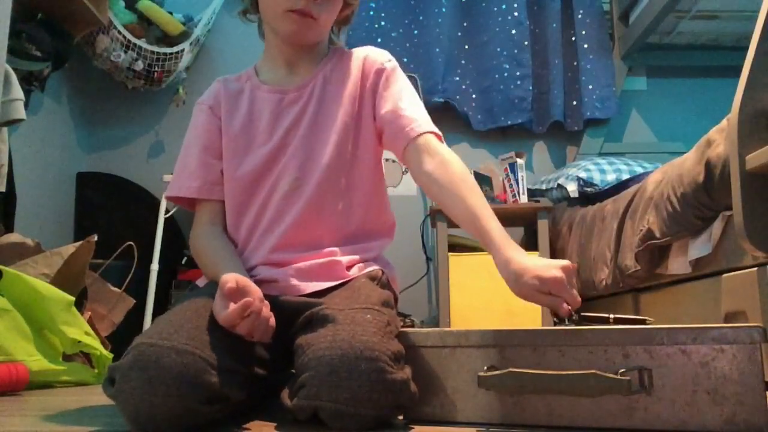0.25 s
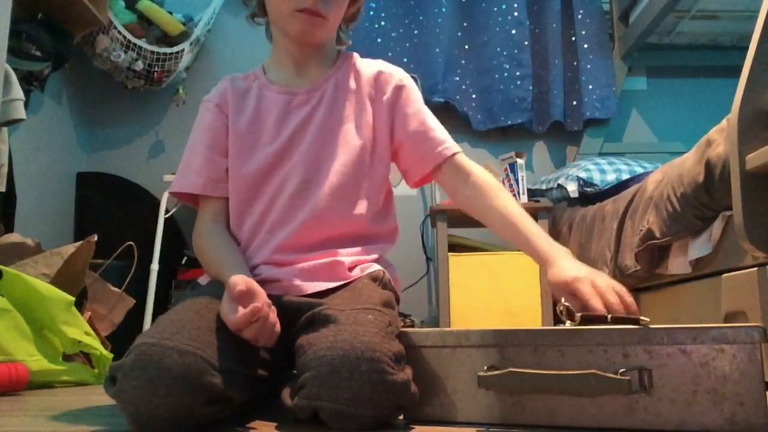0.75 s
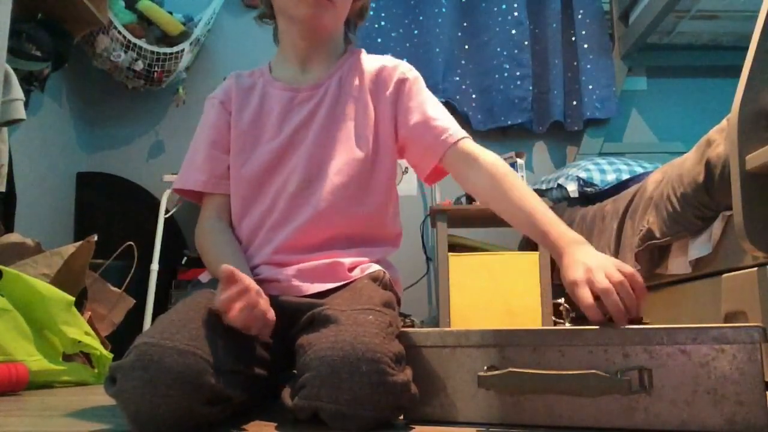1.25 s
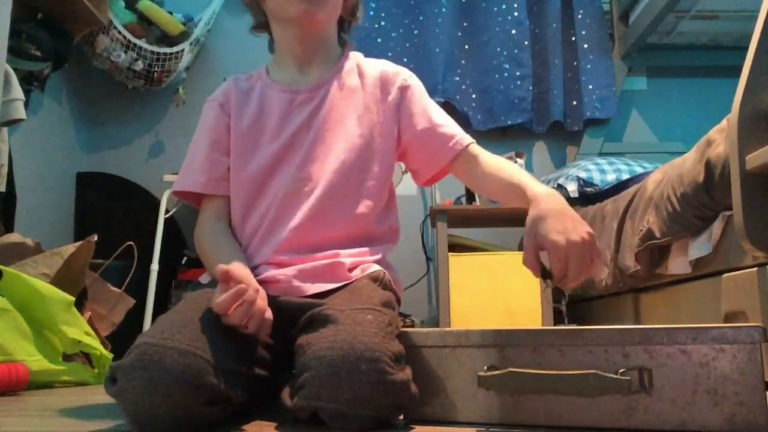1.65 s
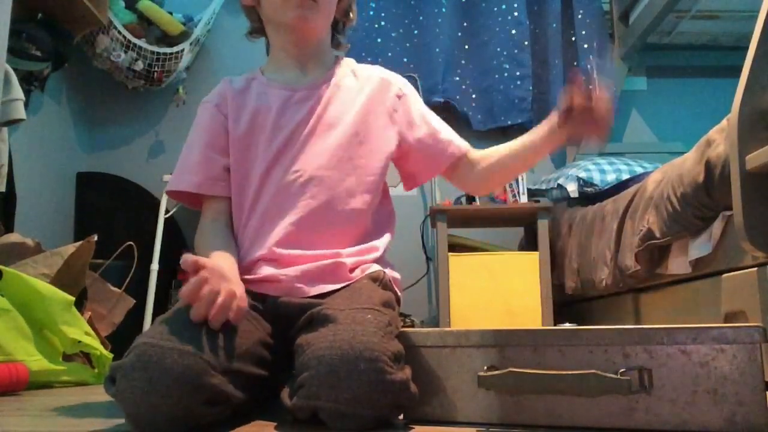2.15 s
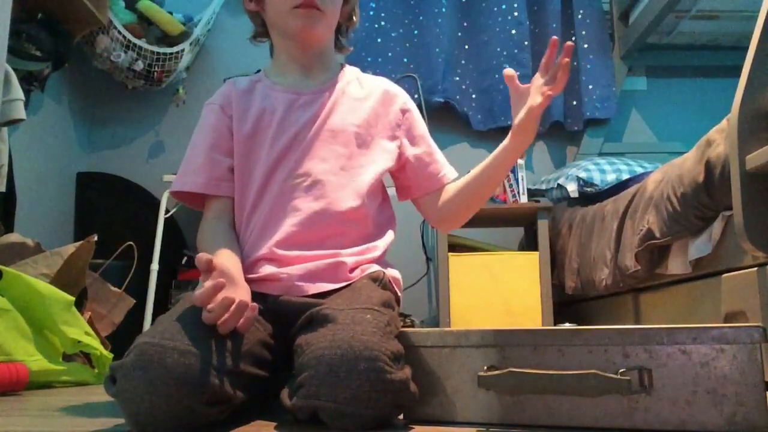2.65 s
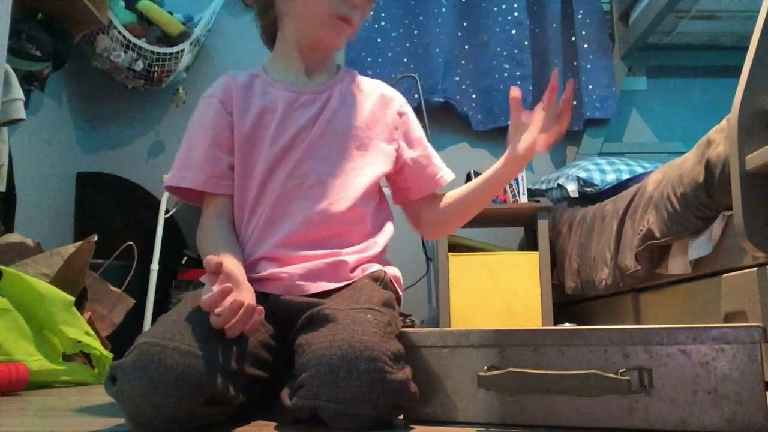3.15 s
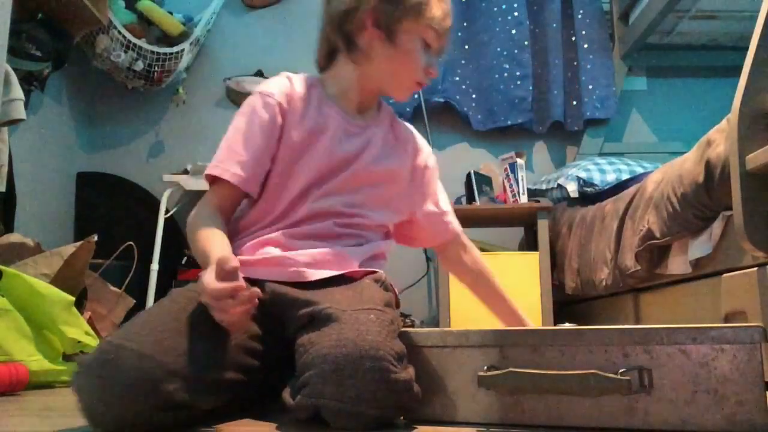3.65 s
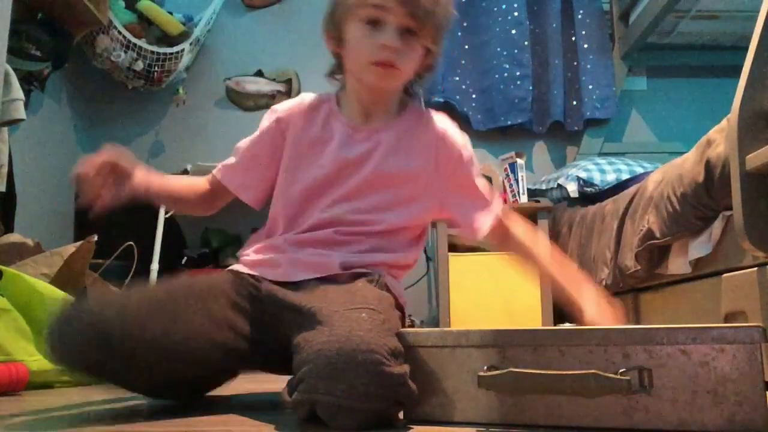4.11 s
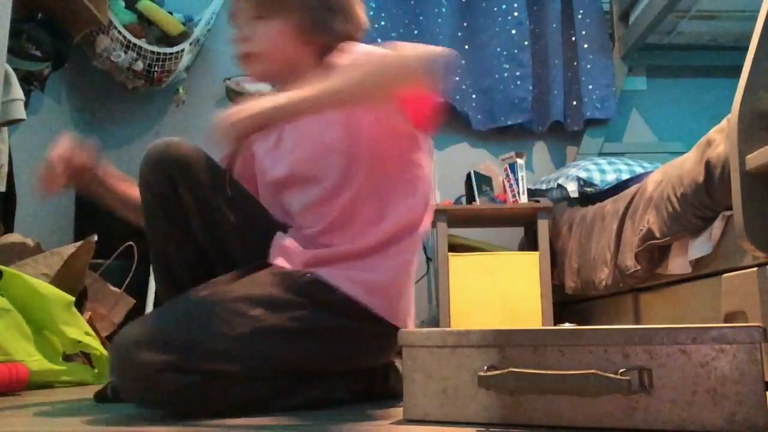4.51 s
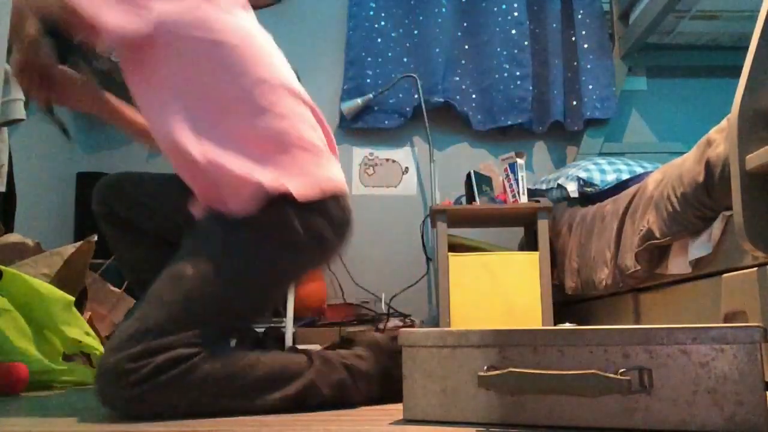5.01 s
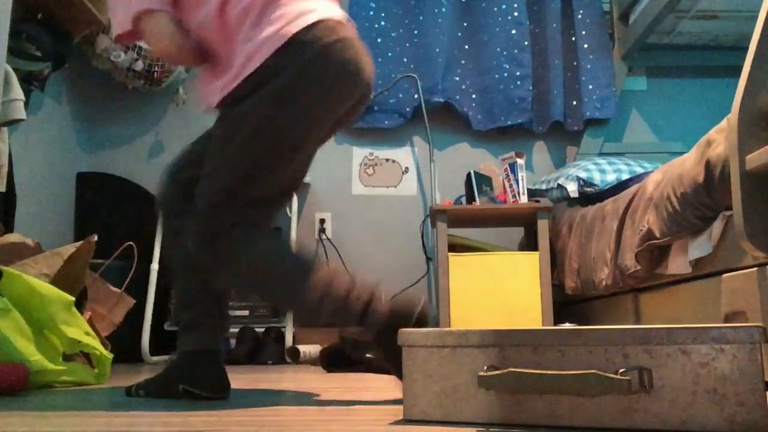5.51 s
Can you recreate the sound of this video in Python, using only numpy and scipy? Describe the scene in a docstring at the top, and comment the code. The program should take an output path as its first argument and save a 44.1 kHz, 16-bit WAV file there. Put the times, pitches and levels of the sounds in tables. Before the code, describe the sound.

A faint wavering hum, hiss and a very faint high tick, ten times a second, run throughout in a small bedroom with a short, dull echo. For the first two seconds, keys are quietly fumbled in a metal box, scraping and knocking so that its walls ring lightly. At 2.1 seconds they are snatched up with a sharper clink and jingle faintly in the air. At about 2.7 seconds they crash onto the wooden floor, by far the loudest sound, with a low boom and a few quick bounces, settling by 3 seconds. After a pause, at 4 seconds the keys are dragged back over the wood with a clattering scrape. From about 4.3 to 5.6 seconds they clink and jingle lightly in the hand, while clothes rustle softly and the floorboards thud and pop under shifting weight, fading near the end.

```python
"""A small bedroom: a wavering hum, faint hiss and a tick ten times a second go on throughout.
First a hand fumbles keys in a metal box, which rings as they knock and rub. At 2.1 s it snatches them
and tosses them up, jingling. At 2.7 s they crash onto the wooden floor, which booms. From 4 s they are
dragged back and clink in the hand, while clothes rustle and the boards thud and pop under shifting weight."""
import sys
import numpy as np
from scipy import signal
from scipy.fft import rfft, irfft, next_fast_len
from scipy.io import wavfile
from scipy.ndimage import uniform_filter1d

SR = 44100
rng = np.random.default_rng(int(sys.argv[2]) if len(sys.argv) > 2 else 0)


def write(x):
    x = np.atleast_2d(x).T
    wavfile.write(sys.argv[1], SR, np.round(np.clip(x, -1, 1) * 32767).astype(np.int16))


N = 254449


def gain(db):
    """Turns decibels into a number to multiply by."""
    return 10 ** (np.asarray(db) / 20)


def unit(x):
    """Scales a signal to an average size (rms) of 1."""
    return x / np.sqrt(np.mean(x ** 2))


def fade(t, t60):
    """Dies away by 60 dB in t60 seconds, the 'ring time'."""
    return np.exp(-np.log(1000) * t / t60)


def ring(tones, length_s, phase=0.):
    """Adds up fading tones, given as (pitch [Hz], level [dB], ring time [s])."""
    t = np.arange(int(length_s * SR)) / SR
    hz, db, t60 = np.transpose(tones)[:, :, None]
    return np.sum(gain(db) * fade(t, t60) * np.sin(2 * np.pi * hz * t + phase), axis=0)


def add(out, s, sound):
    """Mixes a sound in, starting at s seconds."""
    i = int(s * SR)
    out[i:i + len(sound)] += sound[:N - i]


def noise(colour):
    """Noise of size 1; its colour says how strong the low and high pitches are."""
    hz, db = np.transpose(colour)
    size = next_fast_len(N, True)
    freqs = np.arange(size // 2 + 1) * SR / size + 1
    shape = gain(np.interp(np.log(freqs), np.log(hz), db))
    return unit(irfft(rfft(rng.standard_normal(size)) * shape, size)[:N])


def wander(per_s):
    """A smooth random wobble of size 1 that heads for a new value per_s times a second."""
    hold = int(SR / per_s)
    steps = np.repeat(rng.standard_normal(N // hold + 1), hold)
    return unit(uniform_filter1d(uniform_filter1d(steps, hold), hold)[:N])


def tiny_taps(per_s, scatter_db):
    """A shower of tiny taps at random times, some stronger than others."""
    hits = rng.random(N) < per_s / SR
    sizes = gain(scatter_db * np.minimum(rng.exponential(size=N), 3))
    return unit(hits * sizes * rng.choice([-1, 1], N))


def through(x, response):
    """Lets every sample of x set off the response, which is scaled to an energy of 1."""
    return signal.fftconvolve(x, response / np.sqrt(np.sum(response ** 2)))[:N]


def swells(rows, extra_column=None):
    """A loudness curve with one rounded peak per row; an extra column can add to its level."""
    out = np.zeros(N)
    for row in rows:
        s, db, rise_s, fall_s = row[:4]
        start = max(s - rise_s, 0)
        t = start - s + np.arange(int((s + fall_s - start) * SR)) / SR
        from_peak = np.hypot(t / np.where(t < 0, rise_s, fall_s), .1) - .1
        extra_db = row[extra_column] if extra_column else 0
        add(out, start, gain(db + extra_db) * fade(from_peak, .84))
    return out


def room(x):
    """The walls add a short, dull echo that starts after 6 ms."""
    t = np.arange(int(.6 * SR)) / SR
    tail = rng.standard_normal(len(t)) * fade(t, t60=.27) * (t > .006)
    tail = signal.lfilter(*signal.butter(1, 4900, fs=SR), tail)
    return x + gain(-21) * through(x, tail)


# colour of the quiet room: (pitch [Hz], relative level [dB])
AIR_COLOUR = [(20, -26.5), (40, -12), (58, -2.5), (88, -11), (120, -6), (150, -13.5), (200, -13.5),
              (360, -28), (480, -28.5), (1000, -36.5), (2100, -42), (6500, -45), (8300, -39.5),
              (10400, -39), (13000, -44), (15800, -47.5)]
# humming tones: (pitch [Hz], waver [share of the pitch], level [dB])
HUM_TONES = [(120.3, 0.008, -59.5), (278, .01, -78.5)]

def air_and_hum():
    """Room air and microphone hiss, with two hums that waver in pitch and loudness."""
    out = noise(AIR_COLOUR) * gain(-61.5 + .88 * wander(3.5))
    for hz, waver, db in HUM_TONES:
        loudness = gain(db + 2 * wander(22))
        pitch = hz * (1 + waver * wander(33))
        out += loudness * np.sin(2 * np.pi * np.cumsum(pitch) / SR)
    return out


# ticks that come late: (tick number [counted from 0])
LATE_TICKS = [1, 26]

def ticking(first_s=.0562, every_s=.10005, late_s=.0185, pitch_hz=10600, width_s=.0001):
    """A faint, high tick repeats, never quite equally loud."""
    out = np.zeros(N)
    count = np.arange(int(N / SR / every_s))
    times = first_s + every_s * count + late_s * np.isin(count, LATE_TICKS)
    t = np.arange(-40, 41) / SR
    tick = np.exp(-(t / width_s) ** 2 / 2) * np.sin(2 * np.pi * pitch_hz * t)
    for s in times:
        add(out, s + t[0], tick * gain(-51 + 1.5 * rng.standard_normal()))
    return out


# clothes moving: (time [s], hiss level [dB], swish level [dB])
CLOTH_MOVES = [(3.42, -73.5, -76), (3.51, -67, -78), (3.8, -68.5, -72), (4.09, -68, -73),
               (4.21, -55.5, -70), (4.28, -62.5, -84), (4.371, -58.5, -65), (4.49, -53, -51.5),
               (4.64, -63.5, -70.5), (4.78, -61, -71.5), (4.87, -62.5, -63.5), (5.0, -65, -66),
               (5.1, -59, -65.5), (5.19, -55.5, -59.5), (5.31, -72, -76.5), (5.42, -67.5, -76),
               (5.55, -70, -76.5), (5.59, -64, -69), (5.65, -68, -77), (5.77, -78.5, -79.5)]
# colours of the three fabric sounds: (pitch [Hz], relative level [dB])
HISS_COLOUR = [(2060, -35), (3500, -12.5), (4680, -22.5), (6170, -11.5), (7510, -16), (9480, 0.5),
               (10800, -11.5), (12100, -4.5), (13000, -11.5), (14100, -21), (15800, -14)]
SWISH_COLOUR = [(180, -19), (300, -8.5), (400, -7.5), (502, -10), (929, -11.5), (1270, -16.5), (3500, -33),
                (4550, -63), (7700, -120)]
SHUFFLE_COLOUR = [(150, -24), (290, 1.5), (400, -4), (600, -18.5)]

def clothes():
    """Fabric hisses finely, swishes lower down and shuffles on the boards, all a little patchy."""
    times, *levels_db = np.transpose(CLOTH_MOVES)
    hiss_db, swish_db = (np.interp(np.arange(N) / SR, times, db, left=-200) for db in levels_db)
    hiss = noise(HISS_COLOUR) * gain(hiss_db + 2.06 * wander(41))
    swish = noise(SWISH_COLOUR) * gain(swish_db + 2 * wander(38))
    shuffle = noise(SHUFFLE_COLOUR) * gain(hiss_db - 1.5 + 2 * wander(23))
    return hiss + swish + shuffle


# low thuds and higher pops: (time [s], level [dB], pitch [Hz])
BOARD_THUDS = [(4.263, -35, 64), (4.337, -51.5, 370), (4.388, -43.5, 290), (4.489, -34, 301),
               (4.518, -36.5, 357), (4.669, -32, 73.4), (4.687, -32.5, 70.4), (4.76, -44, 280),
               (4.827, -36.5, 294), (4.88, -41, 147), (4.884, -41.5, 269), (4.939, -40.5, 147),
               (4.947, -35.5, 295.4), (4.998, -43, 56.5), (4.999, -46.5, 230), (5.113, -48, 285),
               (5.161, -42, 292), (5.205, -41, 118), (5.213, -41.5, 356.5), (5.275, -45, 321),
               (5.289, -46, 121), (5.313, -37, 298), (5.398, -51.5, 303), (5.598, -51, 302.6)]
# the floor's boom under the crash: (pitch [Hz], level [dB], ring time [s])
BOOM_TONES = [(58, -41, .15), (135, -16.5, .09), (200, -13, 0.17), (241, -14.5, 0.12), (188, -38.5, 1)]

def boards(crash_s=2.744):
    """Shifting weight gives each loose board one soft note; the crash makes the whole floor boom."""
    out = np.zeros(N)
    for s, db, hz in BOARD_THUDS:
        ring_s = .064 * (302.5 / hz) ** .49  # lower boards ring longer
        thud = ring([(hz, db, ring_s)], length_s=.25)
        soft_start = 1 - fade(np.arange(len(thud)) / SR, 3 / hz)
        add(out, s, thud * soft_start)
    boom = ring(BOOM_TONES, length_s=.67)
    soft_start = 1 - fade(np.arange(len(boom)) / SR, .02)
    add(out, crash_s, boom * soft_start)
    return out


# four pitch ranges, in the order main, bass, low middle, treble: (bottom [Hz], top [Hz])
PITCH_RANGES = [(1500, 5000), (150, 500), (500, 1500), (5000, 16000)]

def surface(tones, blur_colour, knocks, rubs, taps, blur_ring_s, rub_blur_db, knock_blur_db, knock_db):
    """Knocks and rubs ring a surface's clear tones, plus a noisy blur of many weak ones."""
    hz, width, db = np.transpose(tones)
    ring_s = np.log(1000) / (np.pi * width)  # narrow tones ring longer
    clear = ring(np.transpose([hz, db, ring_s]), length_s=.15)
    blur, out = noise(blur_colour), np.zeros(N)
    t = np.arange(len(clear)) / SR
    phases = np.pi * rng.random((len(knocks), len(tones), 1))
    for band, (edges, drain_s) in enumerate(zip(PITCH_RANGES, blur_ring_s)):
        band_filter = signal.butter(3, edges, "band", fs=SR, output="sos")
        inside = (hz >= edges[0]) & (hz < edges[1])
        rubbing = taps * swells(rubs, extra_column=3 + band if band else None)
        out += through(rubbing, signal.sosfilt(band_filter, clear)) * gain(-9)
        # rubbing feeds the blur with energy, which then drains away
        drain = fade(t, drain_s) ** 2
        energy = np.abs(signal.fftconvolve(rubbing ** 2, drain)[:N])
        energy *= gain(rub_blur_db) ** 2 / np.sum(drain)
        for (s, main_db, *extras_db, spot_hz), phase in zip(knocks, phases):
            level_db = main_db + (extras_db[band - 1] if band else 0)
            add(energy, s, drain * gain(level_db + knock_blur_db) ** 2)
            # the spot that is hit brings out tones near its own pitch
            octaves_off = np.log2(hz / spot_hz)
            tone_db = db + 14.5 * np.exp(-(octaves_off / .2) ** 2 / 2)
            knock = ring(np.transpose([hz, tone_db, ring_s])[inside], .15, phase[inside])
            knock = signal.sosfilt(band_filter, knock * (1 - fade(t, .00083)))
            add(out, s, knock * gain(level_db + knock_db) / np.max(np.abs(knock)))
        out += np.sqrt(energy) * unit(signal.sosfilt(band_filter, blur))
    return out


# the box's clear tones: (pitch [Hz], width [Hz], relative level [dB])
BOX_TONES = [(253, 36, -2), (411, 60, -2), (712, 31, -3.5), (940, 94, -4), (1190, 16, -17),
             (1770, 58, -1.5), (2385, 61, 4.5), (2946, 42, 1), (3230, 62, 0.5), (4260, 125, 1),
             (4680, 310, -1), (5150, 130, -9), (5920, 140, -8.5), (7160, 420, -6), (8620, 280, 3),
             (10900, 450, -13), (12440, 210, -1)]
# colour of its many weak tones: (pitch [Hz], relative level [dB])
BOX_BLUR = [(120, -40), (200, -15), (557, -10), (732, 3), (1120, -5.5), (2730, -3.5), (4480, -2.5),
            (6570, -11.5), (12700, -5.5), (15800, -19)]
# keys hitting the box: (time [s], main level [dB], extra bass [dB], extra low middle [dB],
# extra treble [dB], pitch of the spot hit [Hz])
BOX_HITS = [(0.05, -51, 6, -8, 0.5, 3200), (0.0637, -47.5, 2, -22, -13, 3260),
            (0.0994, -57.5, -9, 1, 5.5, 2330), (0.6443, -42, -12, -3, -1, 1750),
            (1.294, -50.5, -16, -0.5, 0, 1500), (1.4023, -57.5, -5, -14, 11, 2470),
            (1.508, -56, -2, -18, 12.5, 5060), (1.5494, -66, -13, -5, 10, 4220),
            (1.5856, -57, -15, -3, 17.5, 4020), (1.5962, -53.5, -24, -32, 11, 2450),
            (1.7176, -58.5, -6, -1, 11.5, 1210), (1.9885, -56, -3, -1, 14, 2250),
            (2.0766, -33, -24, -9, -29, 1760), (2.089, -32.5, -18, -29, 8.5, 4200),
            (2.1048, -34, 3, -3.5, 11, 4570)]
# keys rubbing along it: (peak time [s], main level [dB], rise [s], fall [s], extra bass [dB],
# extra low middle [dB], extra treble [dB])
BOX_SCRAPES = [(0.078, -56.5, 0.093, 0.18, 8.5, -0.5, -1.5), (0.644, -62, .06, 0.21, 4, 4, 5),
               (0.814, -56, 0.17, 0.2, -2, 4.5, -2.5), (1.305, -59.5, 0.099, 0.19, -7, 4, 1.5),
               (1.336, -51, 0.17, 0.11, -9, -4, -17), (1.47, -52, 0.17, 0.12, 1.5, 4.5, -9),
               (1.6, -60.5, 0.51, 0.23, 0, -2, 5), (1.994, -60.5, 0.12, 0.066, -4, -4.5, 2.5),
               (2.05, -60.5, .12, 0.085, 0, 2, 1.5), (2.09, -40.5, 0.013, 0.18, -8, -12, 12),
               (2.115, -49.5, 0.089, 0.033, 6.5, -6, 10)]

def metal_box():
    """Fumbled keys knock and scrape on the metal walls and set them ringing."""
    return surface(BOX_TONES, BOX_BLUR, BOX_HITS, BOX_SCRAPES, tiny_taps(per_s=900, scatter_db=2.2),
                   blur_ring_s=(.039, .087, .095, .073),
                   rub_blur_db=-8.5, knock_blur_db=-11.5, knock_db=-3.5)


# the floor's clear tones: (pitch [Hz], width [Hz], relative level [dB])
FLOOR_TONES = [(215, 45, -7.5), (285, 50, -5.5), (346, 40, -5.5), (386, 47, -5.5), (654, 70, 0),
               (1048, 45, -5.5), (1325, 130, 0.5), (1484, 60, -14.5), (1721, 100, -10), (2420, 130, -6.5),
               (2690, 80, -9), (3390, 120, -6), (3680, 90, -16), (4090, 81, -17.5), (8300, 130, -14),
               (8850, 190, -12), (9340, 300, -16)]
# colour of its many weak tones: (pitch [Hz], relative level [dB])
FLOOR_BLUR = [(71, -46.5), (120, -12), (354, 1.5), (480, -22), (620, 1), (925, -8.5), (1090, -8.5),
              (2050, -5), (3420, -9.5), (6300, -22), (12600, -26), (15800, -44)]
# keys hitting the floor: same columns as BOX_HITS
FLOOR_HITS = [(2.7373, -7.5, -22.5, -0.5, -9, 1650), (2.7413, -11, -6.5, 4.5, -7, 630),
              (2.7626, -1, -15, -6.5, -9.5, 3630), (2.7675, -21, -12, -12, -10, 2390),
              (2.7783, -17.5, -26, -22, -14.5, 3580), (2.8323, -9.5, -12, -6, -15, 3350),
              (2.8581, -19, -24, -15, -19.5, 2330), (2.8776, -22, -10, -1.5, -20, 543),
              (3.019, -58.5, 11, 1, -8, 2306), (3.113, -74, 11.5, 13, -13.5, 900),
              (4.0429, -37.5, 9.5, 3.5, -15, 653), (4.0733, -34.5, -22, -3, -15.5, 582),
              (4.0883, -30, -16, -8, -10, 3400), (4.0991, -28, -15, -8, -6, 2700),
              (4.1085, -21.5, -10, -3.5, -9, 1050), (4.141, -33, -14, 10.5, -14, 1350),
              (4.1543, -21, -37, -3.5, -1, 2650), (4.1785, -26, 0, 3, 4, 2320),
              (4.1964, -33, -4, 15.5, -19, 920), (4.2088, -27.5, -15, -4, -15, 620)]
# keys skidding on it: same columns as BOX_SCRAPES
FLOOR_SKIDS = [(2.743, -13, .03, 0.05, -0.5, 6, -12.5), (2.758, -16, 0.062, 0.14, -1.5, -5.5, -5.5),
               (2.834, -20.5, 0.022, .19, -5, -8.5, -5), (2.919, -56, 0.3, .15, 18, 12, -15),
               (3.015, -60.5, .05, 0.19, 18, 8, -10.5), (3.11, -83, .2, 0.78, 25.5, 10.5, -9.5),
               (4.044, -52.5, 0.018, 0.41, 22.5, 20.5, -9), (4.167, -24, 0.21, 0.14, -18, -8.5, -9.5),
               (4.188, -30.5, 0.14, 0.072, 4.5, 6, -4), (4.213, -33.5, 0.024, 0.094, 3, -11, -6)]

def wooden_floor():
    """Keys crash, skid and are dragged back; the wood answers with short knocks and scrapes."""
    return surface(FLOOR_TONES, FLOOR_BLUR, FLOOR_HITS, FLOOR_SKIDS,
                   tiny_taps(per_s=2000, scatter_db=3.5), blur_ring_s=(.04, .011, .05, .04),
                   rub_blur_db=-9.5, knock_blur_db=-10.5, knock_db=-2.7)


# the keys' high and low ring: (pitch [Hz], relative level [dB], ring time [s])
HIGH_RING = [(12457, 0, .1), (12275, -8, .1), (12620, -9, .05)]
LOW_RING = [(4604, 0, .045), (4510, -5, .035)]
# colour of their clicks: (pitch [Hz], relative level [dB])
CLICK_COLOUR = [(3500, -41.5), (6000, -16), (8500, 3.5), (10500, 1), (13000, -8.5), (16000, -7)]
# key hitting key: (time [s], click level [dB], high ring level [dB], low ring level [dB])
KEY_CLINKS = [(2.1484, -41.5, -55, -49), (2.2444, -61, -52, -74), (2.296, -54, -52, -62),
              (2.4173, -59, -60, -74), (2.7474, -6.5, -20, -48), (2.8468, -41.5, -32, -27),
              (4.0934, -42, -41, -53), (4.262, -45.5, -49, -66), (4.3946, -29, -40, -72),
              (4.588, -47, -52.5, -72), (4.6645, -43.5, -43.5, -56), (4.6794, -41.5, -45.5, -68.5),
              (4.7064, -38, -49, -72.5), (4.726, -29.5, -37, -42), (4.811, -38, -28, -38),
              (4.9642, -53, -45, -72.5), (5.165, -37.5, -54, -72.5), (5.228, -46.5, -65.5, -59.5),
              (5.2609, -57.5, -57, -58), (5.2935, -44.5, -49, -67), (5.3479, -38, -46.5, -59),
              (5.399, -60.5, -65, -78.5), (5.4327, -30, -42.5, -66)]
# loose keys chattering: (peak time [s], high ring level [dB], rise [s], fall [s],
# extra for the low ring [dB], extra for the clicks [dB])
KEY_JINGLES = [(2.15, -81, .03, 0.19, -2, -7), (2.29, -64, 0.37, 0.26, -12, 1.5),
               (2.418, -67.5, .05, 0.16, -10, -3), (2.526, -65.5, 0.16, 0.26, -14.5, -1.5),
               (2.755, -34, 0.033, 0.24, -1.5, 8), (2.85, -46, .08, 0.15, -8, -16),
               (2.93, -59, .2, 0.39, -20, -10), (4.102, -58.5, 0.15, 0.2, -12, 3),
               (4.176, -60.5, 0.24, 0.25, -10, 13), (4.74, -55.5, 0.26, .4, -17, -4),
               (4.825, -46.5, 0.037, 0.096, -23.5, -12), (4.966, -59.5, 0.035, 0.37, -22, -5),
               (5.302, -65.5, 0.27, .12, -7, 7.5), (5.354, -47.5, .035, .09, -20.5, -9),
               (5.442, -60, .17, .13, -5, 3), (5.648, -67.5, .2, .37, -12, -6)]

def keys(free_ring_s=.027):
    """A clink is a bright rattle and a ring, cut short by the next touch; loose keys chatter on."""
    out, rattle = np.zeros(N), np.zeros(N)
    t = np.arange(int(.2 * SR)) / SR
    bright = noise(CLICK_COLOUR)
    high, low = ring(HIGH_RING, length_s=.2), ring(LOW_RING, length_s=.2)
    click_shape = fade(t, .0022) + .3 * fade(t, .02)
    ring_shape = fade(np.maximum(t - free_ring_s, 0), .024) * (1 - fade(t, .0075))
    for s, click_db, high_db, low_db in KEY_CLINKS:
        add(rattle, s, gain(click_db) * click_shape)
        add(out, s, ring_shape * (gain(high_db) * high + gain(low_db) * low))
    taps = tiny_taps(per_s=900, scatter_db=2.2)
    muffle = fade(t, .07)  # touching keys quieten each other
    out += through(taps * swells(KEY_JINGLES), high * muffle)
    out += through(taps * swells(KEY_JINGLES, extra_column=4), low * muffle ** 2)
    chatter = taps * swells(KEY_JINGLES, extra_column=5)
    rattle += np.abs(through(chatter, fade(t, .027)))
    treble_only = signal.butter(4, 5000, "high", fs=SR, output="sos")
    return out + signal.sosfilt(treble_only, rattle * bright)


def scene():
    """Box, floor, keys and boards echo in the room; clothes and background are added without echo."""
    echoing = room(metal_box() + wooden_floor() + keys() + boards())
    return (echoing + clothes() + air_and_hum() + ticking())[None]


def record(dry, bottom_hz=23, top_hz=15900):
    """The microphone drops the deepest bass, rounds the loudest peaks and cuts the highest treble."""
    trimmed = signal.sosfilt(signal.butter(2, bottom_hz, "high", fs=SR, output="sos"), dry)
    rounded = .95 * np.tanh(trimmed / .95)
    return signal.sosfilt(signal.ellip(10, .2, 70, top_hz, fs=SR, output="sos"), rounded)


dry = scene()
out = record(dry)
write(out)
```